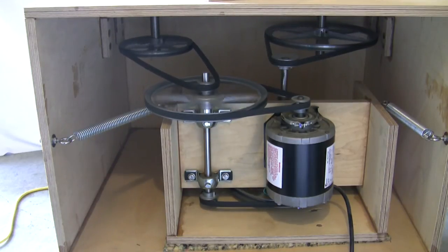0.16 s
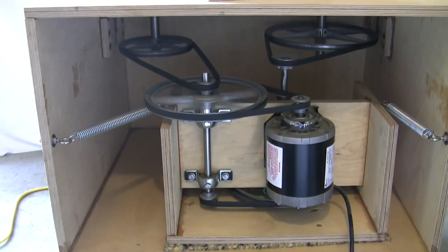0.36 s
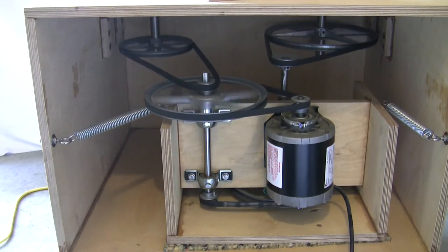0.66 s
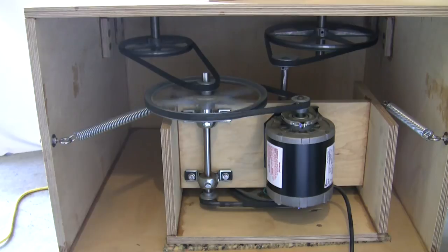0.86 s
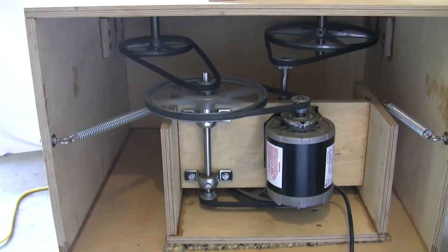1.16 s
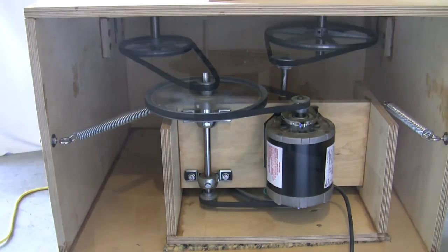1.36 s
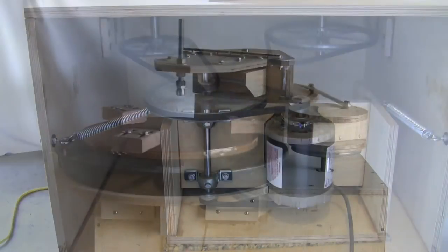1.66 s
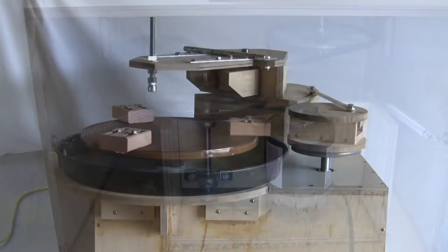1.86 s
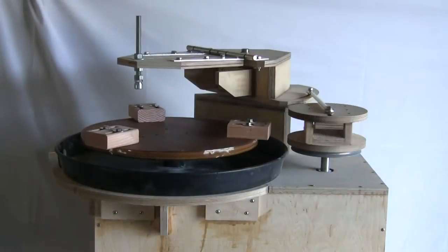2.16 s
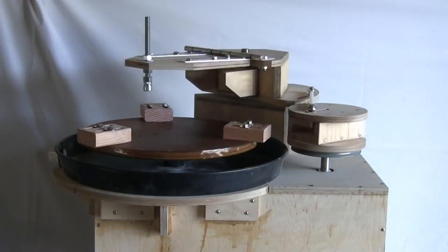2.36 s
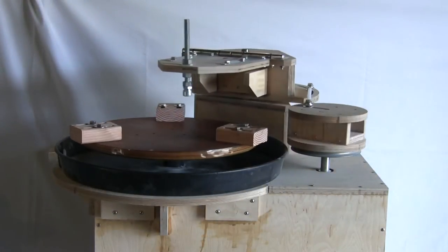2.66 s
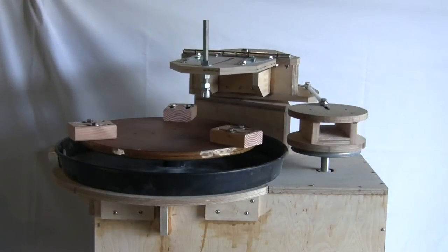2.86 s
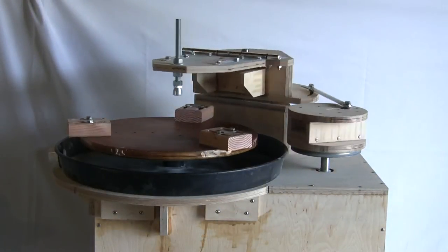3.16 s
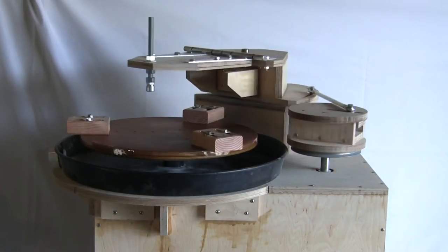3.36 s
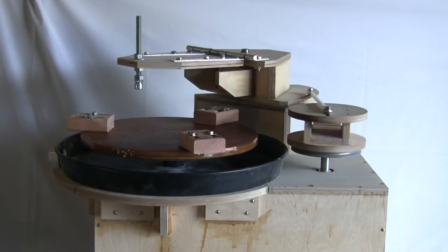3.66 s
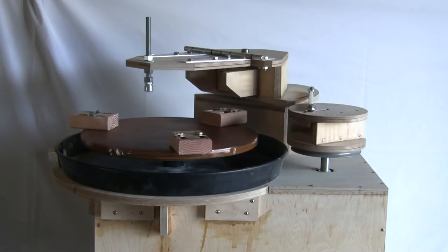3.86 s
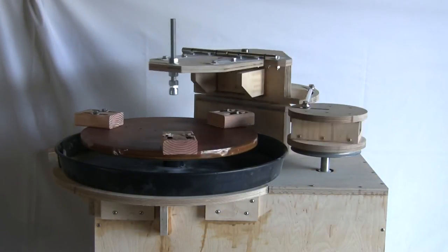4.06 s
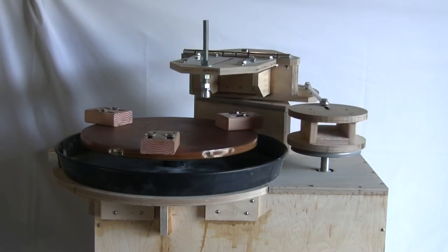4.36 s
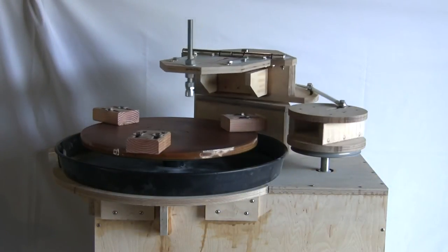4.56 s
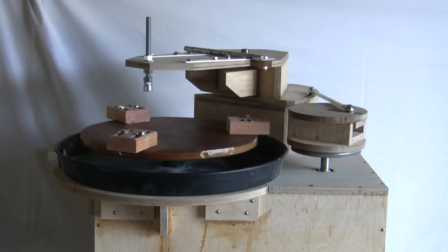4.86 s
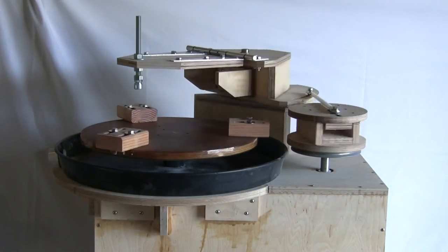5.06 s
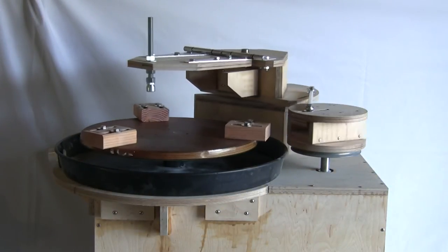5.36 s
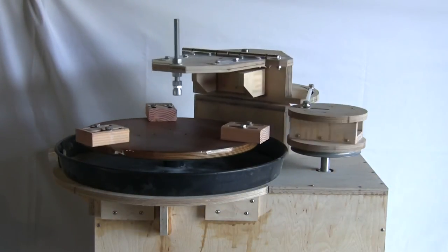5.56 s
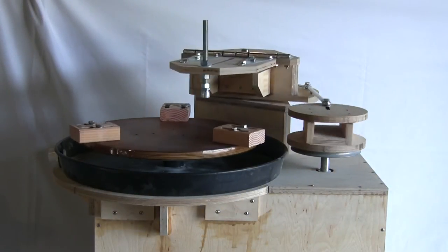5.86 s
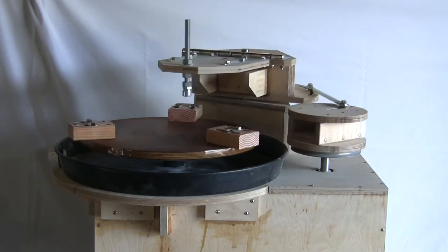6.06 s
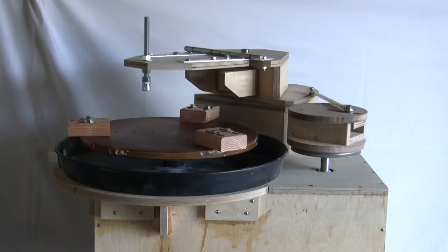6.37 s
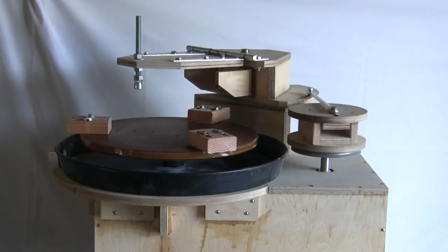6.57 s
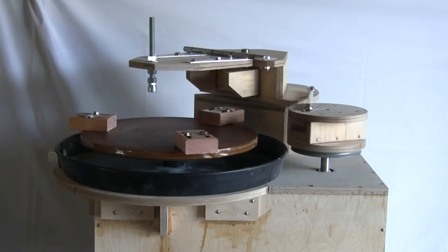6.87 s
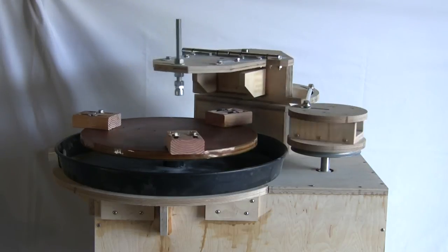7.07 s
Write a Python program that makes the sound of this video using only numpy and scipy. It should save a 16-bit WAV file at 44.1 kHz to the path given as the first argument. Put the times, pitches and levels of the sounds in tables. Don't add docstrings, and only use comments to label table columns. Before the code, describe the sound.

Close to an induction motor and V-belts in an open plywood cabinet: a strong low mains hum swelling nearly four times a second, rotor whine, hissing rumble and a buzzing slack belt that stops after a second. It cross-fades to a farther, duller view where a crank and arm softly tick and thump. Small stereo camera microphones, workshop.

```python
import sys
import numpy as np
from scipy import signal
from scipy.fft import rfft, irfft, next_fast_len
from scipy.io import wavfile
from scipy.ndimage import uniform_filter1d

SR = 44100
rng = np.random.default_rng(int(sys.argv[2]) if len(sys.argv) > 2 else 0)


def linear_from_db(decibels):
    return 10 ** (np.asarray(decibels, float) / 20)


def persist_wave(psi):
    counts = np.round(np.clip(psi, -1, 1) * 32767).astype(np.int16)
    wavfile.write(sys.argv[1], SR, np.atleast_2d(counts).T)


N = 317961
NEAR, FAR = 2, 3

# hum_multiple, level_db, swell_0_to_1, loudest_turns, bend_cycles, furthest_turns
HUM_NEAR = [
    (1, -26.6, .415, .687, .155, .259),
    (2, -36.3, .515, .197, .128, .545),
]
HUM_FAR = [
    (1, -27.7, .209, .295, .115, .859),
    (2, -52, .9, .57, .19, .82),
]
# hum_hz (twice mains), belt_hz, shaft_hz
RATES_NEAR = (119.98, 3.91, 29.563)
RATES_FAR = (120.05, 3.895, 29.538)
# time_s, hum_db, second_multiple_db
SETTLE = [
    (0, -1.5, 0.5),
    (.7, 0.5, -1),
    (1.4, 0.5, 4.5),
    (2.2, 1, -2),
]
# shaft_order, hum_multiple, near_db, far_db
MOTOR_TONES = [(1, 0, -63, -67), (2, 0, -57, -66), (-1, 1, -47, -47), (4, 0, -52, -50), (0, 4, -47, -62),
               (0, 5, -53, -74), (48, -1, -59, -75), (47, 0, -56, -75), (48, 1, -59, -69),
               (49, 1, -55.5, -65.5), (50, 1, -62, -65), (48, 2, -55, -68)]
SLOTS = [(144, -1, -74, -85), (142, 0, -68, -86), (144, 0, -66, -82), (180, -2, -72, -85),
         (176, 0, -80, -84), (177, 0, -70, -84), (178, 0, -73, -81), (179, 0, -68, -84),
         (180, 0, -65, -80), (180, 2, -71, -84), (192, 0, -73, -88),
         (208, 0, -75, -88), (212, 0, -82, -85), (245, 0, -75, -88), (287, -2, -80, -85),
              (287, -1, -66, -88), (288, -1, -66, -80), (287, 0, -63, -92), (288, 0, -63, -81),
              (288, 1, -65, -83), (336, 2, -75, -92)]
# freq_hz, density_db_per_hz
RUMBLE_NEAR = [(160, -34), (205, -9.5), (581, -12.5), (881, -19), (1610, -18), (1810, -25), (4660, -39),
               (15600, -49)]
RUMBLE_FAR = [(100, -12), (529, -8), (592, -12.5), (1610, -19), (2060, -26), (4840, -39.5), (6800, -44.5),
              (15600, -50.5)]
# freq_hz, width_hz, rms_db
MOUNT_NEAR = [(35.8, 11, -55), (60, 20, -59), (96, 1, -43), (103.3, 2.2, -43), (103, 30, -54),
              (149, 55, -41.5)]
PANELS_NEAR = [(206, 6.9, -57), (237.5, 34, -45), (337, 11, -59), (353, 6.7, -49), (389, 18, -48),
               (420, 27, -60), (445, 9.5, -47), (569, 27, -45.5), (641, 23, -53), (730, 40, -49),
               (794, 18, -57), (1007, 29, -53.5), (1382, 67, -51), (1620, 72, -62)]
HOUSING_NEAR = [(4280, 190, -68.5), (5550, 1000, -61), (8490, 730, -57), (9890, 730, -61),
                (11350, 600, -67.5), (12740, 700, -68)]
MOUNT_FAR = [(36, 22, -65), (60.4, 20, -63.5), (87, 1.5, -57), (94.8, 1.3, -49), (101.7, 1.4, -55),
             (105, 43, -44), (131.85, 2.6, -45.5), (157.5, 42, -50.5)]
PANELS_FAR = [(242.6, 43, -50), (267.5, 11, -55), (353, 18, -57), (448, 18, -56.5), (532.3, 27, -54),
              (673, 42, -58), (860, 25, -66), (995, 40, -62.5), (1570, 100, -77)]
HOUSING_FAR = [(4200, 120, -82), (5360, 440, -70.5), (6170, 200, -79), (8410, 600, -71.5),
               (9800, 600, -77.5)]
# time_s, rumble_db
LOAD = [
    (2.2, 0),
    (3, -0.5),
    (3.7, -.5),
    (4.5, -0.5),
    (5.3, -0.5),
    (6.2, 0),
    (6.8, 1),
    (7.21, 2.5),
]
# freq_hz, left_minus_right_db, unrelated_share_near, unrelated_share_far
STEREO = [(30, -3.2, .33, .33), (80, -4.5, .04, .04), (200, -2.5, .06, 0.26), (1300, -3.5, 0.27, 0.37),
          (2390, -1, .43, 0.66), (4400, -2, 0.64, .97), (8100, -3.5, .59, 0.81), (15000, 1.5, 0.54, .9)]
# start_s, end_s
FADE_S = (1.33, 2.23)
# freq_hz, width_hz, level_db
TICK_MODES = [(2520, 350, -3), (2985, 180, 1), (3480, 430, 1.5), (3870, 370, 0.5), (4230, 550, -5),
              (4930, 800, -12)]
THUMP_MODES = [(580, 120, 6.5), (872, 210, 9.5), (1060, 160, -3), (1310, 160, 8.5), (1620, 230, 4),
               (1840, 250, 3), (2220, 280, -2), (2500, 370, -9), (3060, 320, -8)]
# tick_db, tick_tilt_db_per_octave, thump_db
PIN = (0, -6, 3)
CATCH = (0, 5, -3)
BUMP = (-11, -12, 0)
THUD = (-21, -5, 0)
# start_s, level_db, t60_s
PIN_HITS = [(.697, -52.5, 0.13), (2.145, -55, .35), (2.190, -60, .2), (2.430, -52.5, 0.39),
            (5.111, -53.5, 0.31), (5.155, -53.5, 0.36), (5.48, -59, 0.29), (6.368, -63, .2),
            (6.64, -60, .32)]
CATCH_HITS = [
    (2.386, -53.5, 0.47),
    (3.875, -57.5, .25),
    (5.361, -57, 0.56),
]
BUMP_HITS = [
    (2.680, -44, 0.44),
    (3.428, -43, .22),
    (5.656, -43.5, 0.43),
    (6.224, -48, .33),
]
THUD_HITS = [
    (1.02, -44, .2),
    (2.72, -46.5, .55),
    (4.168, -46.5, .35),
    (4.2, -55, .25),
    (5.69, -49, .32),
]
# freq_hz, density_db_per_hz
HISS = [(300, -3), (2000, -1.5), (6000, 3.5), (11000, 0.5), (15700, -10)]


def curve(time_s, value):
    return np.interp(np.arange(N) / SR, time_s, value)


def walk(rate_hz):
    hold = int(SR / rate_hz)
    steps = np.repeat(rng.standard_normal(N // hold + 1), hold)
    return 1.304 * uniform_filter1d(uniform_filter1d(steps, hold), hold)[:N]


def ears(mid, side, hz, place):
    table = np.array(STEREO)
    log_hz = np.log(table[:, 0])
    pan_db = np.interp(np.log(hz), log_hz, table[:, 1])
    share = np.interp(np.log(hz), log_hz, table[:, place])
    pair = np.array([mid + share * side, mid - share * side])
    pair = pair * linear_from_db(np.array([[pan_db], [-pan_db]]) / 2)
    return pair / np.cosh(pan_db * np.log(10) / 40)


def hum(lines, rates, place, wander_turns, lag_s=0, firm_db=(0, 0)):
    out, t = 0, np.arange(N) / SR
    hum_hz, belt_hz, _ = rates
    belt = belt_hz * t + wander_turns * walk(2.1)
    for (multiple, db, swell, loudest, bend, furthest), firm in zip(lines, firm_db):
        swelling = 1 + swell * np.cos(2 * np.pi * (belt - loudest))
        bending = bend * np.cos(2 * np.pi * (belt - furthest))
        rock = swelling * np.exp(2j * np.pi * bending)
        rock = rock + (linear_from_db(firm) - 1) * rock.mean()
        carrier = np.exp(2j * np.pi * multiple * hum_hz * (t - lag_s))
        out = out + np.sqrt(2) * linear_from_db(db) * (rock * carrier).real
    return ears(out, 0, hum_hz, place)


def whine(rates, place, unsteady, flicker_db):
    out, t = 0, np.arange(N) / SR
    hum_hz, _, shaft_hz = rates
    turns = shaft_hz * np.cumsum(1 + unsteady * walk(7)) / SR
    for row in MOTOR_TONES + SLOTS:
        order, multiple = np.round(row[:2])
        angle = 2 * np.pi * (order * turns + multiple * hum_hz * t + rng.random())
        depth_db = flicker_db * min(order + 2 * multiple, 8) / 8
        level_db = row[place] + depth_db * walk(13)
        tone = np.sqrt(2) * linear_from_db(level_db) * np.exp(1j * angle)
        tone_hz = order * shaft_hz + multiple * hum_hz
        out = out + ears(tone.real, 0.38 * tone.imag, tone_hz, place)
    return out


def rumble(colour, db, resonances, rates, place, shaft, mains, belt, swell_db, flicker_db, load_db=0):
    size = next_fast_len(N)
    hz, t = np.arange(1, size // 2 + 2) * SR / size, np.arange(N) / SR
    table = np.array(colour)
    power = linear_from_db(2 * np.interp(np.log(hz), np.log(table[:, 0]), table[:, 1]))
    power = power * linear_from_db(2 * db) / power.sum()
    for centre_hz, width_hz, rms_db in resonances:
        hill = 1 / (1 + (2 * (hz - centre_hz) / width_hz) ** 2) ** 2
        power = power + hill * linear_from_db(2 * rms_db) / hill.sum()
    noise = rfft(rng.standard_normal((2, size))) * np.sqrt(power * size / 2)

    hum_hz, belt_hz, shaft_hz = rates
    throb = shaft * np.cos(2 * np.pi * shaft_hz * t)
    throb = throb + mains * np.cos(2 * np.pi * hum_hz * t) ** 3
    lump = belt * np.cos(2 * np.pi * belt_hz * t)
    out, swell = 0, walk(3.0)
    for octave in np.arange(4.5, 14.5, .5):
        band_hz = 2 ** octave
        window = np.cos(np.pi * np.clip(np.log2(hz) - octave, -.5, .5)) ** 2
        mid, side = irfft(noise * window, size)[:, :N]
        band_flicker_db = flicker_db * min(3000 / band_hz, 1)
        gain = linear_from_db(swell_db * swell + band_flicker_db * walk(14))
        gain = gain * (1 + lump + min(band_hz / 1500, 1) * throb)
        gain = gain * linear_from_db(load_db / (1 + (band_hz / 2500) ** 2))
        out = out + gain * ears(mid, side, band_hz, place)
    return out


def buzz():
    start_hz, sag_hz_per_s = 143.1, 1.15
    first_db, first_db_per_s, first_stops_s = -45, 8, 1.15
    second_db, second_stops_s, release_db_per_s = -42, .87, 60
    t = np.arange(N) / SR
    angle = 2 * np.pi * (start_hz - sag_hz_per_s * t / 2) * t
    first_db = first_db + first_db_per_s * t
    first_db = first_db - 2 * release_db_per_s * np.maximum(t - first_stops_s, 0)
    second_db = second_db - release_db_per_s * np.maximum(t - second_stops_s, 0)
    upper = np.sin(2 * angle) + linear_from_db(-22) * np.sin(3 * angle) + linear_from_db(-22) * np.sin(4 * angle)
    tone = linear_from_db(first_db) * np.sin(angle) + linear_from_db(second_db + 1.3 * walk(11.2)) * upper
    return ears(np.sqrt(2) * tone, 0, start_hz, NEAR)


def ring(burst, modes, scatter_db, tilt_db=0):
    out = 0
    for hz, width_hz, db in modes:
        b, a = signal.iirpeak(hz, hz / width_hz, SR)
        mid, side = signal.lfilter(b, a, signal.lfilter(b, a, burst))
        tilted_db = db + tilt_db * np.log2(hz / modes[0][0])
        gain = linear_from_db(tilted_db + scatter_db * rng.standard_normal())
        out = out + gain * ears(mid, side, hz, FAR)
    return out / np.sqrt(np.mean(out[:, :SR // 30] ** 2))


def knocks():
    out, t = np.zeros((2, N + SR)), np.arange(SR // 2) / SR
    kinds = (PIN, PIN_HITS), (CATCH, CATCH_HITS), (BUMP, BUMP_HITS), (THUD, THUD_HITS)
    for (tick_db, tilt_db, thump_db), hits in kinds:
        for start_s, db, t60_s in hits:
            burst = np.exp(-np.log(1000) * t / t60_s) * rng.standard_normal((2, len(t)))
            burst[0, [0, int(.006 * SR), int(.013 * SR)]] += [13, -11, 9]
            tick = linear_from_db(tick_db) * ring(burst, TICK_MODES, scatter_db=.8, tilt_db=tilt_db)
            thump = linear_from_db(thump_db) * ring(burst, THUMP_MODES, scatter_db=1.5)
            start = int(start_s * SR)
            out[:, start:start + len(t)] += linear_from_db(db) * (tick + thump)
    return out[:, :N]


def scene():
    time_s, *firm_db = np.transpose(SETTLE)
    firm_db = [curve(time_s, db) for db in firm_db]
    near = hum(HUM_NEAR, RATES_NEAR, NEAR, wander_turns=0.02, firm_db=firm_db)
    near = near + whine(RATES_NEAR, NEAR, unsteady=0.0004, flicker_db=2.5)
    near = near + rumble(RUMBLE_NEAR, -37.5, MOUNT_NEAR + PANELS_NEAR + HOUSING_NEAR, RATES_NEAR, NEAR,
                         shaft=0.046, mains=0.039, belt=0.027, swell_db=.15, flicker_db=1.1)
    near = near + buzz()

    far = hum(HUM_FAR, RATES_FAR, FAR, wander_turns=.02, lag_s=.0014)
    far = far + whine(RATES_FAR, FAR, unsteady=0.000501, flicker_db=3.5)
    time_s, load_db = np.transpose(LOAD)
    far = far + rumble(RUMBLE_FAR, -43.5, MOUNT_FAR + PANELS_FAR + HOUSING_FAR, RATES_FAR, FAR,
                       shaft=0.043, mains=0.073, belt=0.0032, swell_db=-0.32, flicker_db=0.96,
                       load_db=curve(time_s, load_db))

    fade = curve(FADE_S, [0, 1])
    return near * np.cos(np.pi * fade / 2) + far * np.sin(np.pi * fade / 2) + knocks()


def low_pass(x):
    return signal.sosfilt(signal.butter(12, 15780, fs=SR, output="sos"), x)


def record(dry):
    hiss_db = -62
    hz = np.arange(1, N // 2 + 2) * SR / N
    table = np.array(HISS)
    colour = linear_from_db(np.interp(np.log(hz), np.log(table[:, 0]), table[:, 1]))
    hiss = irfft(rfft(rng.standard_normal((2, N))) * colour, N)
    mix = dry + linear_from_db(hiss_db) * hiss / hiss.std()
    return low_pass(mix)


dry = scene()
out = record(dry)
persist_wave(out)
```